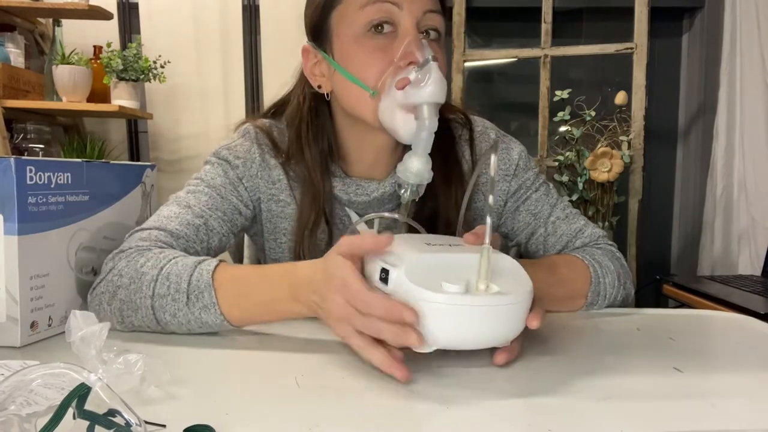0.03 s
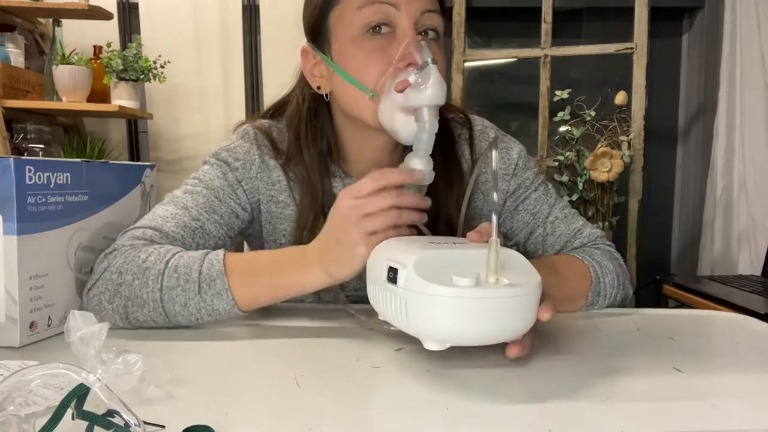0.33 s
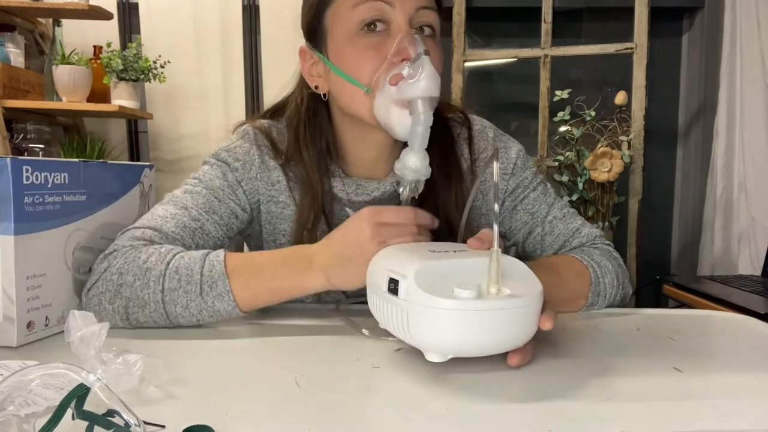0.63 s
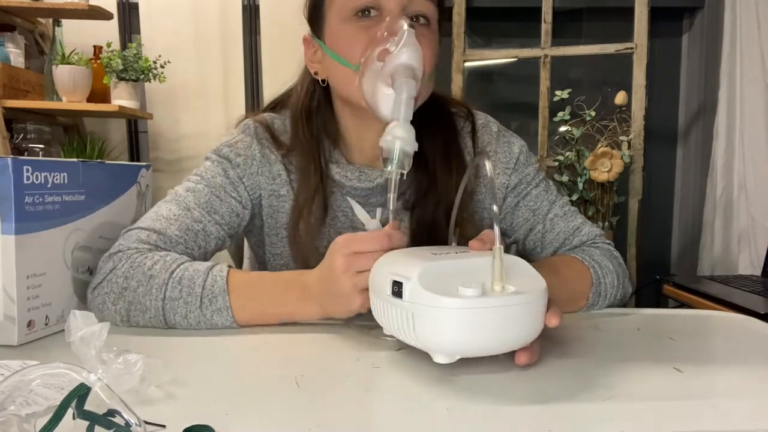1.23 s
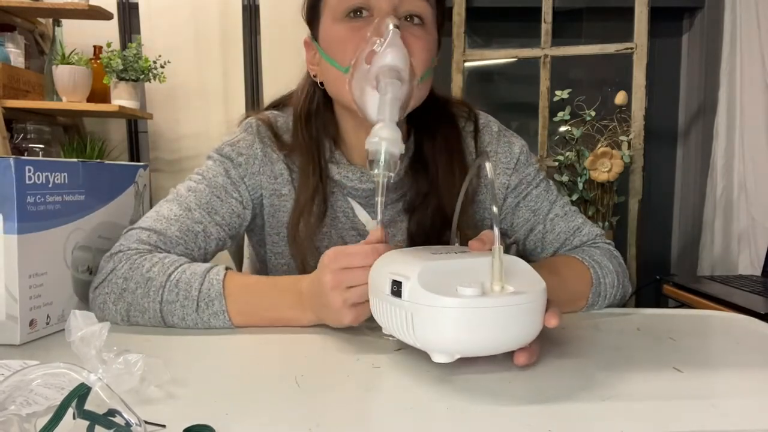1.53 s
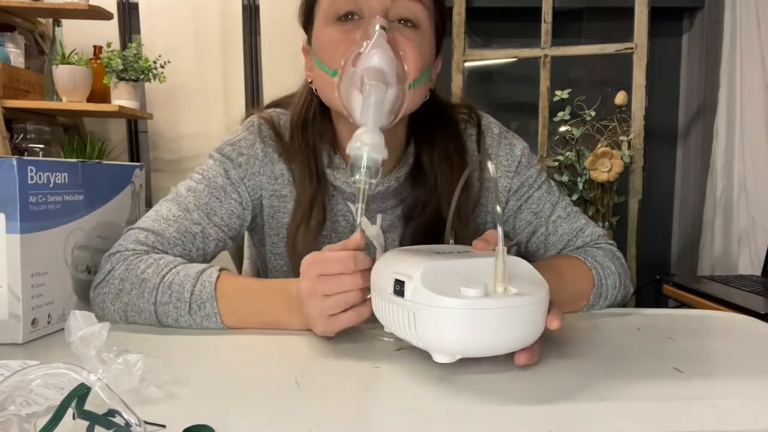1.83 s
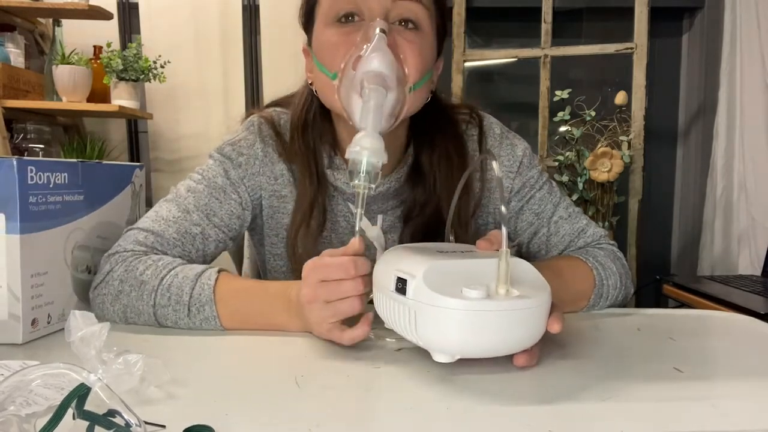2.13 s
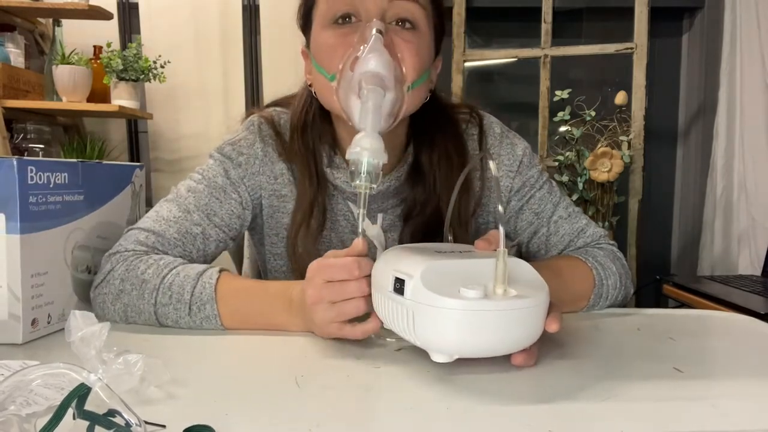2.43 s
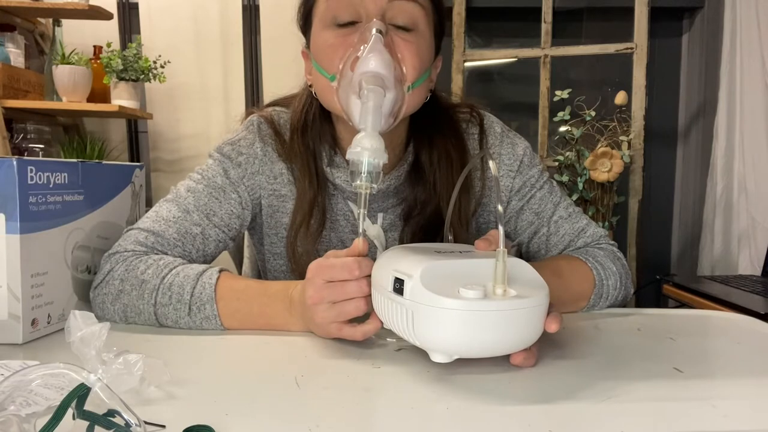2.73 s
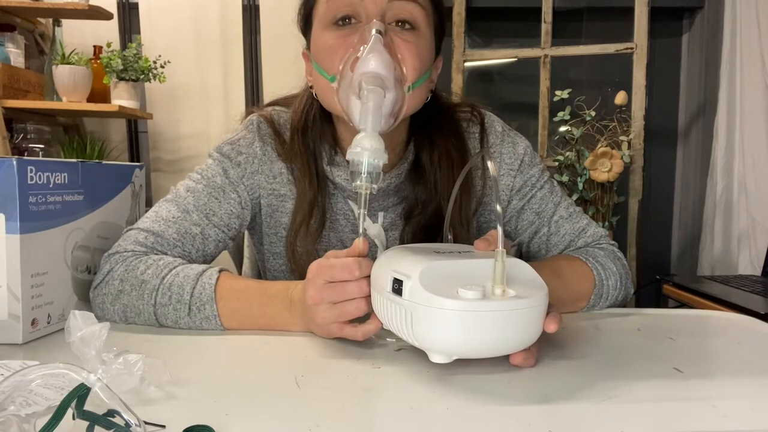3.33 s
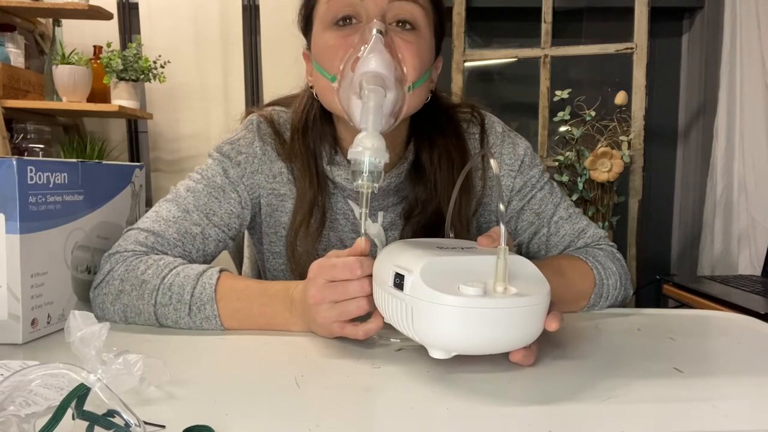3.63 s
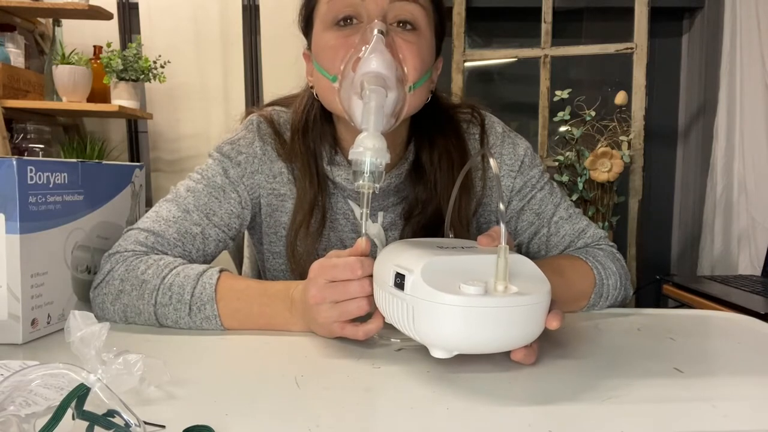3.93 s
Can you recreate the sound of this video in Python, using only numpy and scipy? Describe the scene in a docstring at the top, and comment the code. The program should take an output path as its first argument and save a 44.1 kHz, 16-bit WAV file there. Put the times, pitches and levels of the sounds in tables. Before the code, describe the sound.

A nebulizer runs with a steady compressor hum under a bright, spitting hiss.

```python
"""A steady hum under a bright, spitting hiss: a small piston compressor drives a nebulizer on a table.
Its motor turns just under the mains rate, so the hum beats against the mains, and air puffs once a turn.
The air jet in the medicine cup tears liquid into mist. The tilted cup sputters and whistles at first;
the hiss changes colour as the cup is turned upright. A microphone with two ports (left, right) is close by."""
import sys
import numpy as np
from scipy import signal
from scipy.fft import rfft, irfft, next_fast_len
from scipy.io import wavfile
from scipy.ndimage import uniform_filter1d, map_coordinates

SR = 44100
rng = np.random.default_rng(int(sys.argv[2]) if len(sys.argv) > 2 else 0)


def store_wav(level_fs):
    """Save 16-bit WAV to argv[1]."""
    pcm = np.round(np.clip(np.atleast_2d(level_fs), -1, 1) * 32767)
    wavfile.write(sys.argv[1], SR, pcm.T.astype(np.int16))


N = 176400
TIME = np.arange(N) / SR
SHAFT_HZ, MAINS_HZ = 55.03, 60


def amp(db):
    """Turn decibels into a gain."""
    return 10 ** (np.asarray(db) / 20)


def unit(x):
    """Scale to an average (rms) strength of 1."""
    return x / np.sqrt(np.mean(x ** 2) + 1e-20)


def along(points, hz):
    """Read a table of (frequency, value) points on a log frequency axis."""
    f, value = np.transpose(points)
    return np.interp(np.log(hz + 1), np.log(f + 1), value)


def curve(points):
    """Join (time, value) points with straight lines, one value per sample."""
    return np.interp(TIME, *np.transpose(points))


def wobble(rate):
    """A smooth curve through `rate` random values a second."""
    values = rng.standard_normal(int(N * rate / SR) + 4)
    return map_coordinates(values, [TIME * rate])


def filtered(x, response):
    """Give each frequency of x the gain and phase of response(hz)."""
    size = next_fast_len(N + SR // 4)
    hz = np.fft.rfftfreq(size, 1 / SR)
    return irfft(rfft(x, size) * response(hz), size)[..., :N]


def ports(balance_db, lead_rad):
    """Left and right gains that make the left louder by balance_db and earlier by lead_rad."""
    half = amp(balance_db / 2) * np.exp(.5j * lead_rad)
    return np.array([half, 1 / half]) / np.sqrt((abs(half) ** 2 + abs(half) ** -2) / 2)


def stereo_noise(colour, likeness, path):
    """Coloured noise of strength 1; likeness runs from 0 (unrelated sides) to 1 (one shared noise)."""
    def gains(hz):
        spread = np.arccos(np.clip(along(likeness, hz), 0, 1)) / 2
        return amp(along(colour, hz)) * np.array([np.cos(spread), np.sin(spread)])
    mid, side = filtered(rng.standard_normal((2, N)), gains)
    return unit(filtered(np.array([mid + side, mid - side]), path))


def patchy(x, depth_db, bands, frames):
    """Patches of sound, `bands` wide and `frames` long, flare and fade alike on both sides."""
    spectra = signal.stft(x, nperseg=512)[2]
    patches = uniform_filter1d(rng.standard_normal(spectra.shape[1:]), bands, axis=0)
    patches = uniform_filter1d(patches, frames, axis=1)
    spectra = spectra * amp(depth_db * unit(patches))
    return unit(signal.istft(spectra, nperseg=512)[1][:, :N])


def stroke(angle, sharp, peak_rad=2.2):
    """The piston's push: a hump that rises to 1 once a turn."""
    return np.exp(sharp * (np.cos(angle - peak_rad) - 1))


# How alike the housing sounds on both sides: f/Hz, likeness
HOUSING_LIKENESS = [(100, 1.4), (400, 0.5), (650, 0.3), (1300, 0.74), (2000, 0.74), (4000, 0.23)]
# How much louder it is on the left: f/Hz, level/dB
HOUSING_BALANCE = [(100, 10), (600, 0.5), (1200, -4), (2000, 0.2), (4000, -1)]
# How far the left is ahead: f/Hz, phase/rad
HOUSING_LEAD = [(100, 1), (600, -0.52), (1000, -0.26), (1450, -1.05), (2100, -1.2), (3000, -1.42),
                (4500, -2)]
def housing_noise(colour):
    """Noise as it reaches the two ports from the compressor's housing."""
    def path(hz):
        return ports(along(HOUSING_BALANCE, hz), along(HOUSING_LEAD, hz))
    return stereo_noise(colour, HOUSING_LIKENESS, path)


# Extra lead of the left port as the microphone's body bends the sound: f/Hz, phase/rad
CUP_LEAD = [(4600, .7), (5200, 0), (7300, .4), (8300, -.3), (9700, .2), (10400, .15), (11000, -.4),
            (12500, .7), (13200, .05), (13700, -.1), (14200, .4), (15200, .65), (15900, -.1)]
def from_cup(hz, lead_s=.00019):
    """Sound from the cup reaches the left port first, and upside down compared with the right."""
    return ports(0, 2 * np.pi * hz * lead_s - np.pi + along(CUP_LEAD, hz))


# How alike the cup sounds on both sides: f/Hz, likeness
CUP_LIKENESS = [(4000, 1), (6200, 0.28), (8000, 0.88), (10500, 1), (12000, 1), (15000, 0.97)]
def cup_noise(colour):
    """Noise as it reaches the two ports from the medicine cup."""
    return stereo_noise(colour, CUP_LIKENESS, from_cup)


# Colour of the rustle: f/Hz, relative level/dB
RUB_COLOUR = [(400, -20), (1200, 4), (3000, 8), (5000, -2), (9000, -31)]
def tube_rub(at_s=.53, half_length_s=.03, peak_db=-40):
    """A brief, soft rustle as the tube is handled."""
    swell = np.exp(-((TIME - at_s) / half_length_s) ** 2)
    return amp(peak_db) * swell * housing_noise(RUB_COLOUR)


# Tones made by adding two rates: multiple of the mains rate, multiple of the shaft rate, level/dB
MAGNETIC_TONES = [(2, 0, -59.5), (2, 1, -53.5), (2, 2, -68.5), (4, 0, -61.5), (-2, 13, -61), (2, 17, -59),
                  (2, 19, -57.5)]
def motor_hum(angle):
    """The magnetic pull of the mains on the induction motor beats against the slightly slower shaft."""
    mains_angle = 2 * np.pi * MAINS_HZ * TIME
    hum = np.zeros(N)
    for m, k, db in MAGNETIC_TONES:
        hum += amp(db) * np.cos(m * mains_angle + k * angle + 2 * np.pi * rng.random())
    return np.sqrt(2) * hum


# Colour of the valve hiss: f/Hz, relative level/dB
VALVE_COLOUR = [(1500, -76), (1950, -14.5), (2330, 2.5), (2600, -4.5), (2950, -14), (3200, 1), (3780, -26),
                (4070, -1), (4250, -32), (4700, -76)]
# Its loudness: t/s, level/dB
VALVE_LOUDNESS = [(0, -47.5), (.5, -50.5), (1, -49), (1.5, -45), (1.8, -44.5), (2.1, -46), (2.7, -45.5),
                  (3.3, -44.5), (4, -42)]
def valve_chatter(angle, stroke_db=-.5, rough_db=2.5, waver_db=1):
    """Air chatters through the valves in a few narrow ringing bands, dipping a little at each stroke."""
    level_db = curve(VALVE_LOUDNESS) + waver_db * wobble(30)
    chatter = amp(stroke_db * stroke(angle, sharp=1.9) + rough_db * wobble(300))
    hiss = patchy(housing_noise(VALVE_COLOUR), depth_db=2, bands=4, frames=5)
    return amp(level_db) * unit(chatter * hiss)


# Colour of the rushing air and rattle: f/Hz, relative level/dB
RUSH_COLOUR = [(10, -23), (30, -7), (330, -8.5), (410, -5), (520, 1), (910, -5), (1370, -2), (1720, -15.5),
               (2000, -7), (2600, -14.5), (3300, -17), (4000, -18.5), (4600, -27), (7000, -96)]
# Slow drift of its loudness: t/s, level change/dB
RUSH_DRIFT = [(0, -0.7), (.5, 0), (.9, 1.2), (1.4, -0.5), (2, -1), (3, -0.5), (4, -1)]
def housing_rush(angle, level_db=-40, stroke_db=2.5, rough_db=2.5):
    """The rush and rattle of the housing swell with each piston stroke."""
    swell = amp(stroke_db * stroke(angle, sharp=2.5) + rough_db * wobble(250))
    return amp(level_db + curve(RUSH_DRIFT)) * unit(swell * housing_noise(RUSH_COLOUR))


# Tones of the hum: multiple of the shaft rate, level/dB, left minus right/dB, left lead/rad
HUM_TONES = [(1, -42.2, -2, -0.1), (2, -40.8, -1, -0.0), (3, -54.0, 0, -0.2), (4, -41.0, -2, -0.1),
             (5, -49.5, 0, -0.6), (6, -48.9, 1, -0.0), (7, -52.2, -3, -0.5), (8, -49.0, -12, 2.7),
             (9, -45.9, -7, -0.8), (10, -43.3, -8, 0.3), (11, -36.4, -1, -0.6), (12, -47.3, 1, -0.8),
             (13, -58.3, -6, -0.8), (14, -56.9, -4, -0.8), (15, -66.3, 2, -2.7), (16, -58.4, -4, -1.4),
             (17, -55.9, -4, -0.7), (18, -53.6, -6, -0.3), (19, -52.9, -1, -0.9), (20, -57.1, -3, -0.9),
             (21, -60.0, -3, 1.8), (22, -63.5, -9, 0.1), (23, -53.8, 4, -0.2), (24, -56.1, -2, -2.7),
             (25, -54.2, 4, 0.0), (26, -62.5, 2, 0.4)]
# Strength of the buzzing tones above the hum: f/Hz, level/dB
BUZZ_LEVELS = [(1480, -62), (1620, -63.5), (1750, -67), (1870, -66), (1980, -57.5), (2060, -67),
               (2150, -71), (2400, -64), (2600, -71), (3200, -73)]
def pump_hum(angle, top_multiple=58, waver_db_per_khz=.5):
    """The piston strokes shake the housing, making tones at whole multiples of the shaft rate."""
    buzz = [(k, along(BUZZ_LEVELS, k * SHAFT_HZ), 0, rng.normal())
            for k in range(len(HUM_TONES) + 1, top_multiple + 1)]
    hum = np.zeros((2, N))
    for k, db, balance_db, lead_rad in list(HUM_TONES) + buzz:
        khz = k * SHAFT_HZ / 1000
        lag_rad = 1.8 * k ** 2 + .45 * khz ** 4 * rng.normal()  # smears each stroke over the turn
        gain = amp(db + waver_db_per_khz * khz * wobble(14))
        tone = gain * np.exp(1j * (k * angle - lag_rad))
        hum += np.sqrt(2) * (ports(balance_db, lead_rad)[:, None] * tone).real
    return hum


# Short whistles: t/s, half length/s, f/Hz, width/Hz, level/dB
CUP_WHISTLES = [(0.284, .025, 7580, 299, -43.5), (.42, 0.056, 8350, 348, -46),
                (0.486, 0.019, 7740, 222, -43), (1.15, 0.24, 15050, 1090, -38)]
def cup_whistles():
    """While the cup turns, the jet briefly catches one of its ringing notes: a narrow band of noise."""
    whistles = np.zeros(N)
    for at_s, half_length_s, hz, width_hz, db in CUP_WHISTLES:
        band = (wobble(width_hz) + 1j * wobble(width_hz)) * np.exp(2j * np.pi * hz * TIME)
        swell = np.exp(-((TIME - at_s) / half_length_s) ** 2)
        whistles += amp(db) * swell * unit(band.real)
    return filtered(whistles, from_cup)


# Colour of the gulps: f/Hz, relative level/dB
GULP_COLOUR = [(4500, -40), (5400, -13), (5850, 0), (6400, -7), (7000, -16), (7650, -7), (8000, -13),
               (8300, -8), (9000, -18), (9600, -4), (10300, -20), (15000, -22)]
# Their loudness, dying away as the cup comes upright: t/s, level/dB
GULP_LOUDNESS = [(0, -44.5), (.3, -45), (.37, -41.5), (.5, -42), (.56, -50), (.65, -42.5), (.8, -41.5),
                 (.95, -44), (1.05, -54), (1.3, -80)]
def cup_gulps(angle, rise_s=.002, fade_60db_s=.038, spread_db=3, max_turns=240):
    """In the tilted cup each stroke bursts a gulp of liquid, strong or weak, which rings the cup."""
    turn = (angle / (2 * np.pi)).astype(int)
    age_s = angle % (2 * np.pi) / (2 * np.pi * SHAFT_HZ)
    size_db = spread_db * np.clip(rng.standard_normal(max_turns), -2, 1.2)[turn]
    rise = 1 - np.exp(-age_s / rise_s)
    bursts = rise * amp(size_db - 60 * age_s / fade_60db_s)
    return amp(curve(GULP_LOUDNESS)) * unit(bursts * cup_noise(GULP_COLOUR))


# The clear spits: t/s, starting level/dB
CLEAR_SPITS = [(.7377, -32), (.795, -42), (.9168, -27), (1.2974, -30), (1.312, -26), (1.9111, -39),
               (2.0926, -41), (2.8384, -31), (2.851, -31), (3.2725, -27.5), (3.5279, -31), (3.8556, -36)]
# Colour of every droplet: f/Hz, relative level/dB
DROPLET_COLOUR = [(1500, -37), (3000, -10), (4700, -24), (5800, 2.5), (8300, 7), (9000, 2), (10300, 9),
                  (11300, 0), (15000, -11)]
def droplets(spatter_per_s=41, fade_60db_s=.023):
    """Droplets spit in the cup: a few clear ones over a fine random spatter, each a burst of noise."""
    when, size = rng.random((int(spatter_per_s * N / SR), 2)).T
    spatter_db = -49 - 2.75 * np.log(size + .02)  # many faint, a few louder
    spatter = list(zip(when * N / SR, spatter_db))
    age_s = np.arange(SR // 20) / SR
    power = np.zeros(N + SR)
    for at_s, db in list(CLEAR_SPITS) + spatter:
        start = int(at_s * SR)
        power[start:start + len(age_s)] += amp(db - 60 * age_s / fade_60db_s) ** 2
    return np.sqrt(power[:N]) * cup_noise(DROPLET_COLOUR)


# Colour of the hiss with the cup tilted, and upright: f/Hz, relative level/dB
TILTED_COLOUR = [(3000, -70), (4200, -25), (4650, -20.1), (5000, -22.5), (5400, -16.8), (5850, -7),
                 (6500, -8), (7000, -9.5), (7650, -8.3), (7950, -11), (8300, -10), (9050, -16), (9600, 3.5),
                 (10250, -8.9), (10550, -7), (11000, -12), (11300, 1), (11700, -11), (12300, -9),
                 (12950, -10), (13700, -14.0), (14400, -6), (14850, -12.3), (15200, -3), (15650, -5.5)]
UPRIGHT_COLOUR = [(3000, -70), (4650, -54), (4950, -52), (5200, -13.5), (5600, -18.5), (6400, -14.5),
                  (7000, -19.5), (8350, -13), (9200, -18.5), (9550, -12.5), (9850, -4.5), (10150, -3.5),
                  (10550, 0.0), (10850, -6.5), (11100, -28), (11650, -19), (12000, -14), (12350, -16),
                  (12700, -20), (13300, -10.5), (13750, -20), (14300, -9.5), (15100, -12.5), (15400, -17.6),
                  (15700, -11.5)]
# The turning of the cup: t/s, share of the upright colour (0 to 1)
UPRIGHT_SHARE = [(0, 0), (.75, 0.16), (1.1, 0.64), (1.55, 0.68), (1.85, 1), (4, 1)]
# Loudness of the jet: t/s, level/dB
JET_LOUDNESS = [(0, -33), (0.25, -35), (0.43, -32.5), (0.55, -35), (0.7, -34), (0.85, -33), (1, -35),
                (1.1, -33.5), (1.25, -31.5), (1.42, -32.5), (1.6, -31.5), (1.8, -30.5), (2.1, -30.5),
                (2.6, -31.5), (3.2, -29.5), (3.4, -31), (4, -30)]
def mist_jet(angle, gurgle_db=.37, fizz_db=.85):
    """The pulsing air jet tears liquid into mist and rings the cup."""
    upright = curve(UPRIGHT_SHARE)
    tilted = 1 - upright
    hiss = np.sqrt(tilted) * cup_noise(TILTED_COLOUR) + np.sqrt(upright) * cup_noise(UPRIGHT_COLOUR)
    hiss = patchy(hiss, depth_db=1.3, bands=4, frames=9)  # narrow, slow flares
    hiss = patchy(hiss, depth_db=1.7, bands=20, frames=2)  # wide, quick flicker
    pulse_db = (.8 * tilted - .2) * np.cos(angle)  # the jet pulses more in the tilted cup
    flow = amp(pulse_db + gurgle_db * wobble(35.03) + fizz_db * wobble(400))
    return amp(curve(JET_LOUDNESS)) * unit(flow * hiss)


def scene(wander_hz=.02, flutter_hz=.041):
    """One slightly unsteady shaft sets the beat for the hum, the air and the jet."""
    shaft_hz = SHAFT_HZ + wander_hz * wobble(2.96) + flutter_hz * wobble(29.97)
    angle = 2 * np.pi * np.cumsum(shaft_hz) / SR  # how far the shaft has turned, in radians
    compressor = pump_hum(angle) + motor_hum(angle) + housing_rush(angle) + valve_chatter(angle)
    cup = mist_jet(angle) + cup_gulps(angle) + cup_whistles() + droplets()
    return compressor + cup + tube_rub()


def record(dry, top_hz=15850):
    """Cut away the very highest treble."""
    return filtered(dry, lambda hz: hz < top_hz)


dry = scene()
out = record(dry)
store_wav(out)
```